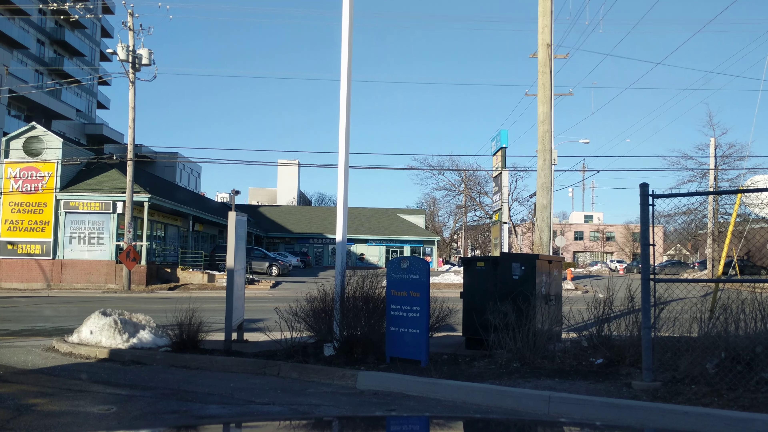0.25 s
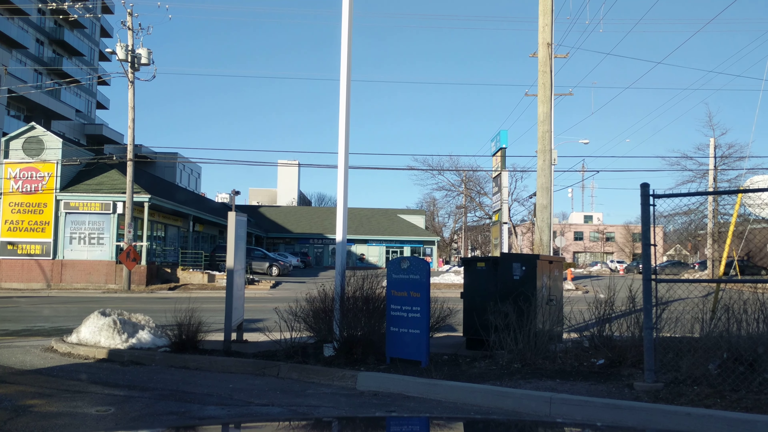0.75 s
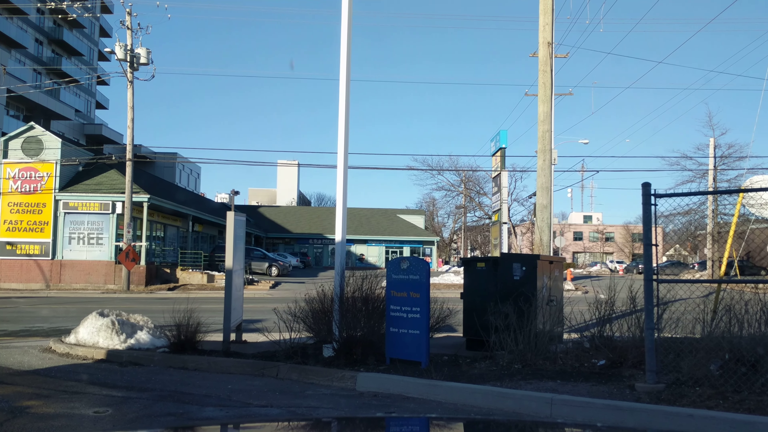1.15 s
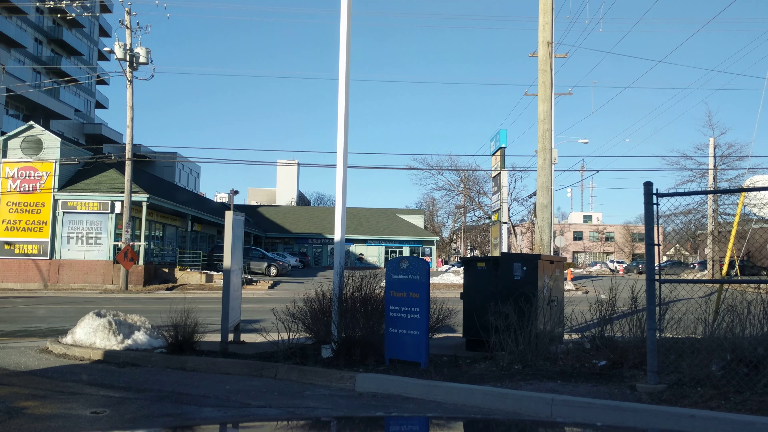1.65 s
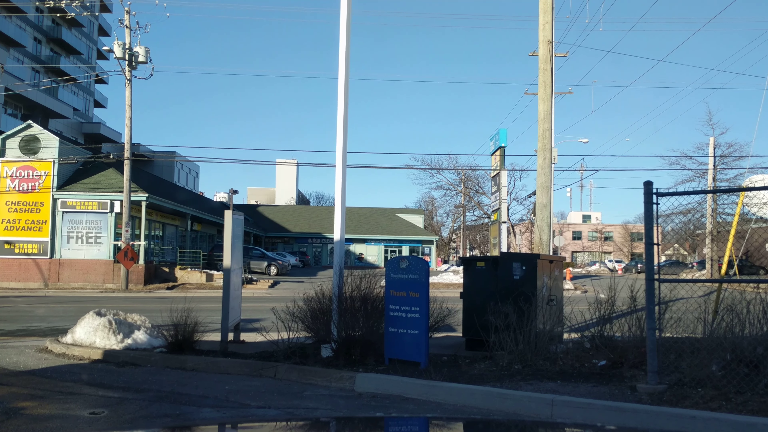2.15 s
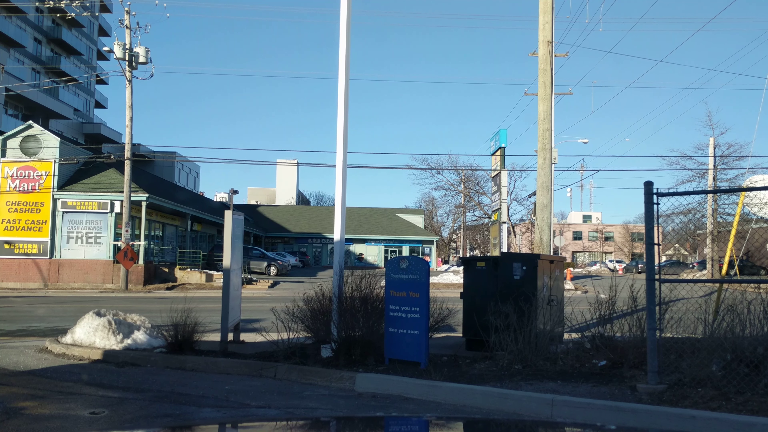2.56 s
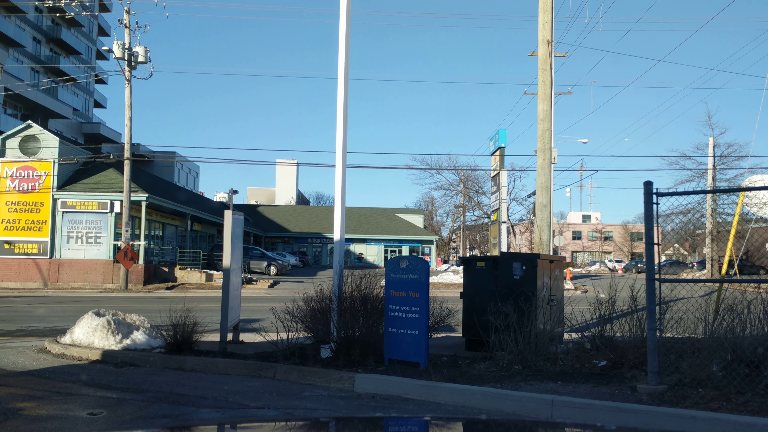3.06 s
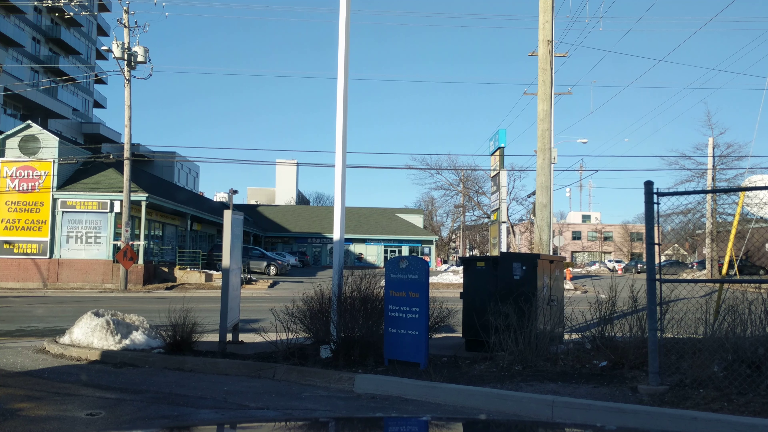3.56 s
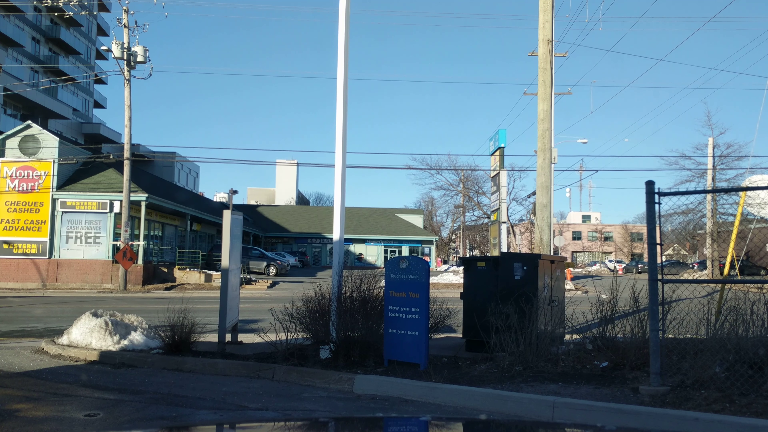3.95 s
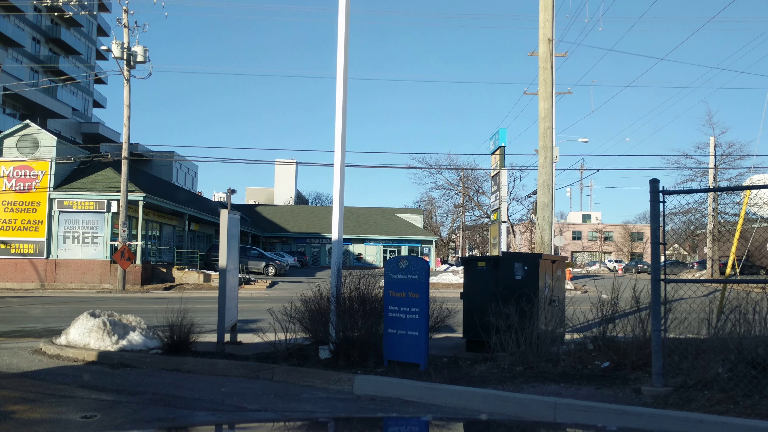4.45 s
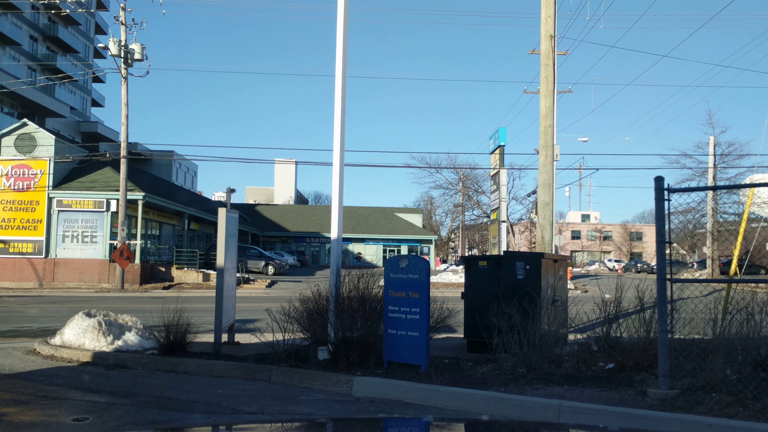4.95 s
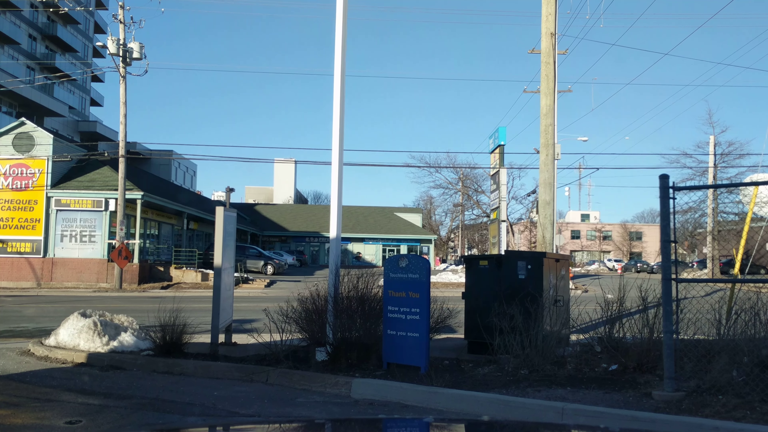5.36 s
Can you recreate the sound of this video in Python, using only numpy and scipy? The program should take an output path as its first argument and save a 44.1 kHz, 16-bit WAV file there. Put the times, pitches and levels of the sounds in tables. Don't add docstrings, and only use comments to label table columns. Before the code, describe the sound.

Inside a closed car, powerful blowers roar steadily over the body with deep buffeting and a wavering fan tone, then an engine drone swells.

```python
import sys
import numpy as np
from scipy import signal
from scipy.fft import rfft, irfft
from scipy.io import wavfile
from scipy.ndimage import uniform_filter1d

SR = 44100
rng = np.random.default_rng(int(sys.argv[2]) if len(sys.argv) > 2 else 0)


def transcribe(u):
    v = np.clip(np.atleast_2d(u).T, -1, 1)
    q = np.round(v * 32767).astype(np.int16)
    wavfile.write(sys.argv[1], SR, q)


def undo_db(level):
    steps = np.asarray(level, float) / 20
    return 10 ** steps


N = 246959


def follow(rows):
    time_s, *columns = np.transpose(rows)
    return [np.interp(np.arange(N) / SR, time_s, column) for column in columns]


def wander(rate_hz):
    t = np.arange(0, N + 256, 256) / SR
    phase = rng.random(24)
    slow = 0
    for hz, turn in zip(np.linspace(.3, rate_hz, len(phase)), phase):
        slow = slow + np.sin(2 * np.pi * (hz * t + turn))
    return np.interp(np.arange(N) / 256, np.arange(len(t)), slow) / np.sqrt(len(phase) / 2)


def tone(hz, rms_db):
    cycles = np.cumsum(hz * np.ones(N)) / SR + rng.random()
    return np.sqrt(2) * undo_db(rms_db) * np.sin(2 * np.pi * cycles)


def steady(x):
    power = uniform_filter1d(uniform_filter1d(x ** 2, size=3500), size=3500)
    return x / np.sqrt(abs(power) + 1e-20)


def gusts(rows, rise_db_per_s, fall_db_per_s, rest_db):
    peak_s = np.array([row[0] for row in rows])[:, None]
    peak_db = np.array([row[1] for row in rows])[:, None]
    late_s = np.arange(0, N + 64, 64) / SR - peak_s
    each_db = peak_db - np.where(late_s < 0, -rise_db_per_s * late_s, fall_db_per_s * late_s)
    level_db = np.maximum(each_db.max(axis=0), rest_db)
    return np.interp(np.arange(N) / 64, np.arange(late_s.shape[1]), level_db)


RANGE_EDGES_HZ = [63, 97, 225, 480, 1550, 6500]
# (frequency [Hz], density [dB per Hz])
THROUGH_BODY = [(28, -22), (36, -14), (55, -11), (68, 5.5), (95, -6), (200, -9.5), (400, -16), (500, -21.5),
                (1000, -25), (1550, -31), (2500, -35.5), (3800, -38.5), (6000, -53), (8300, -62.5),
                (17000, -71)]
# (frequency [Hz], width [Hz], lift [dB])
CABIN_MODES = [(66.8, 13, 7), (87.1, 8.8, 12.5), (112.4, 12.7, 5.5), (173, 104, 2), (258, 12.4, 2),
               (263, 18, 1), (316, 32, 1.5), (401, 76, 1), (605.4, 52, 5.5), (662, 44, 6.5), (725, 26, 3.5),
               (776, 52, 4), (859, 40, 3.5), (1190, 60, 4), (1310, 55, 1.5), (1430, 110, 1.5),
               (1710, 49, 1.5), (1790, 125, 5.5), (2006, 220, 4), (2900, 170, 0), (2340, 330, 1.5),
               (3920, 150, 0), (5300, 400, 1), (7800, 1200, 0.7), (13150, 150, 2), (3520, 1500, -0.5),
               (9400, 150, 1.5), (10900, 900, 1.5), (12600, 500, 1.5)]


def air_ranges():
    hz = np.fft.rfftfreq(N, 1 / SR)
    body_hz, body_db = np.transpose(THROUGH_BODY)
    colour_db = np.interp(np.log(hz + 1), np.log(body_hz), body_db)
    for mode_hz, width_hz, lift_db in CABIN_MODES:
        colour_db = colour_db + lift_db * np.exp(-np.log(2) * (2 * (hz - mode_hz) / width_hz) ** 2)
    noise = rfft(rng.standard_normal(N)) * undo_db(colour_db)
    above = [np.clip(.5 + 4 * np.log((hz + 1) / edge), 0, 1) for edge in RANGE_EDGES_HZ[1:]]
    shares = -np.diff([1 + 0 * hz, *above, 0 * hz], axis=0)
    return irfft(noise * shares, N)


# (time [s], level [dB])
JET_STRIKE = [
    (0, -29),
    (.8, -28),
    (1.3, -27.5),
    (2.3, -27),
    (3.3, -26),
    (4.2, -27),
    (4.8, -29),
    (5.3, -31),
    (5.6, -30.5),
]
# (time [s], peak level [dB])
THUDS = [(0, -21.5), (.39, -21), (.59, -21), (.76, -17), (1., -21), (1.33, -21.5), (1.61, -21), (1.96, -22),
         (2.12, -28.5), (2.75, -21.5), (2.95, -25), (3.09, -24), (3.2, -24), (3.44, -30), (3.73, -26),
         (4.26, -25), (4.71, -24), (5.11, -20), (5.3, -18), (5.54, -21.5)]


def air():
    ranges = air_ranges()
    buffet = [steady(x) for x in ranges[:3]]
    rush = list(ranges[3:] / ranges[3:].sum(axis=0).std())
    rush[-1] = rush[-1] * undo_db(0.54 * wander(25.))

    t = np.arange(N) / SR
    drone_db = follow(JET_STRIKE)[0]
    strike_db = drone_db + 27.5
    flutter_db, flutter_hz = 1.28, 12.
    roar_db = -29.5
    seal_shut_db, seal_opens_s, seal_eases_db_per_s = -3.2, 0.78, -0.24
    seal_db = seal_shut_db * np.clip(1 - t / seal_opens_s, 0, 1) + seal_eases_db_per_s * t
    levels_db = [
        gusts(THUDS, rise_db_per_s=97, fall_db_per_s=160, rest_db=-28.5),
        -23.5 - 0.33 * strike_db + flutter_db * wander(flutter_hz),
        drone_db + flutter_db * wander(flutter_hz),
        roar_db + 0.16 * strike_db,
        roar_db + 0.3 * strike_db,
        roar_db + .3 + 0.21 * strike_db + seal_db,
    ]
    return (undo_db(levels_db) * np.array(buffet + rush)).sum(axis=0)


# (time [s], peak level [dB], pitch [Hz])
BOOMS = [(.08, -20, 48.7), (.24, -30, 49), (.6, -28, 47), (.92, -18, 44.5), (1.07, -16, 45.6),
         (1.2, -21, 47.7), (1.31, -33, 48.5), (1.57, -22, 45.5), (1.78, -15.5, 44.55), (2.25, -18.5, 44.6),
         (2.42, -24, 47.45), (2.6, -23.5, 45.7), (2.96, -20.5, 44.9), (3.12, -22, 47.7),
         (3.23, -21.5, 44.9), (3.45, -19, 44.8), (3.62, -17, 45.36), (3.72, -16, 45.1), (3.82, -17.5, 44.7),
         (3.95, -18.5, 45.1), (4.05, -19.5, 44.8), (4.14, -18.5, 45.9), (4.38, -18, 44.9),
         (4.59, -15, 44.7), (4.93, -15.5, 44.74), (5.08, -14.5, 44.1), (5.22, -16, 43.2),
         (5.44, -14.5, 45.1)]
# (time [s], peak level [dB], pitch [Hz])
THROBS = [(.08, -18.5, 57.5), (.28, -19, 56.3), (.47, -17.5, 57.5), (.62, -20, 59.1), (.81, -22, 56),
          (1.14, -27, 54.2), (1.53, -26, 56.1), (1.64, -29, 53.6), (2.01, -20.5, 59.5),
          (2.35, -18.5, 52.85), (2.5, -20, 53.6), (2.73, -24.5, 57.64), (3.02, -20.5, 56.16),
          (3.24, -20, 58.55), (4.16, -32, 53.4), (4.3, -18, 53.8), (4.5, -19, 53.95), (4.7, -21, 53.2),
          (4.92, -17.5, 53.27), (5.24, -18.5, 52.93), (5.41, -28, 53.45), (5.54, -19, 59.6)]


def boom():
    boom_hz, throb_hz = follow(BOOMS)[1], follow(THROBS)[1]
    boom_db = gusts(BOOMS, rise_db_per_s=82, fall_db_per_s=66, rest_db=-30) - .8
    throb_db = gusts(THROBS, rise_db_per_s=140, fall_db_per_s=100, rest_db=-29.5) - .8
    return tone(boom_hz + 1.2 * wander(4.5), boom_db) + tone(throb_hz + 2.2 * wander(5.4), throb_db)


# (time [s], level [dB])
BLADE_REACH = [(0, -34), (.1, -31.5), (.3, -44), (.48, -31), (1.05, -32), (1.45, -32), (1.58, -41),
               (1.9, -36), (2.2, -32), (2.5, -32), (2.65, -31), (2.95, -32.5), (3.2, -37), (3.6, -41),
               (4.3, -37), (4.6, -42), (4.9, -33.5), (5.3, -51)]


def blades():
    blade_hz, octave_db = 614.4, -18
    level_db = follow(BLADE_REACH)[0] - .8 + .7 * wander(9.)
    return tone(blade_hz, level_db) + tone(2 * blade_hz, level_db + octave_db)


WHINE = {6: -47, 8: -54, 9: -64, 15: -63, 18: -67, 19: -61}
# (frequency [Hz], level [dB])
BEATS = [(1341, -58), (1697.5, -57), (2058.5, -61), (2569, -65)]
SIDEBANDS = {-1: -89, 0: -87, 1: -93, 4: -94, 5: -94}


def motor():
    motor_hz, chopper_hz, shaft_hz = 180.48, 11643.4, 30.
    lines = [(order * motor_hz, db) for order, db in WHINE.items()]
    lines += BEATS
    lines += [(chopper_hz + k * shaft_hz, db) for k, db in SIDEBANDS.items()]
    return sum(tone(hz, db + 1.5 * wander(3.)) for hz, db in lines)


# (time [s], pitch [Hz], level [dB])
PULL = [
    (4.4, 150.7, -50),
    (4.9, 151.5, -43),
    (5.2, 156.7, -31.5),
    (5.4, 158.1, -24),
    (5.6, 158.4, -30.5),
]


def engine():
    hz, level_db = follow(PULL)
    return tone(hz + 4.53 * wander(7.2), level_db + 3.0 * wander(18.0))


def scene():
    return (air() + boom() + blades() + motor() + engine())[None]


def roll_off(x):
    return signal.sosfilt(signal.butter(12, 16980, fs=SR, output="sos"), x)


def record(dry):
    return roll_off(dry)


dry = scene()
out = record(dry)
transcribe(out)
```